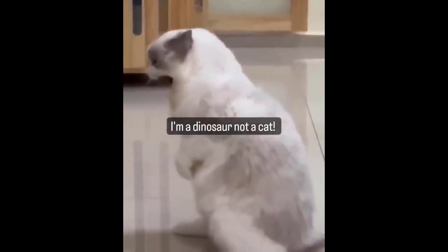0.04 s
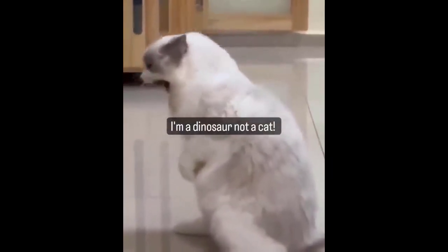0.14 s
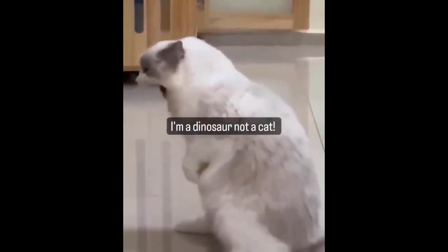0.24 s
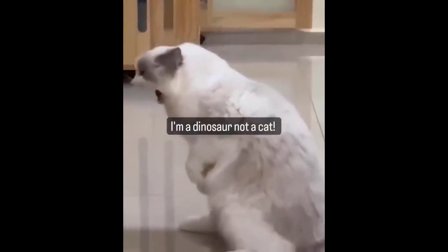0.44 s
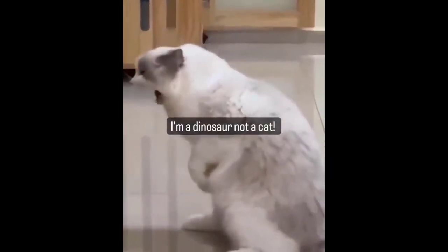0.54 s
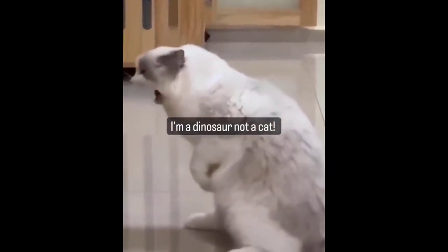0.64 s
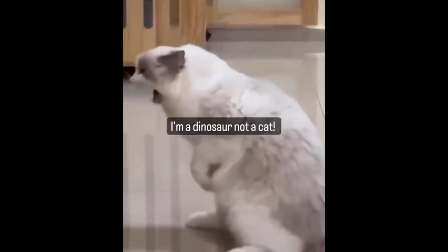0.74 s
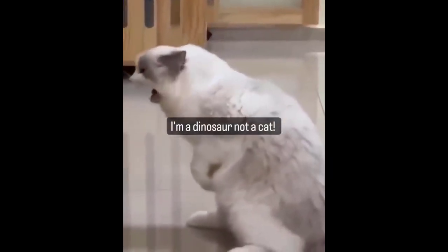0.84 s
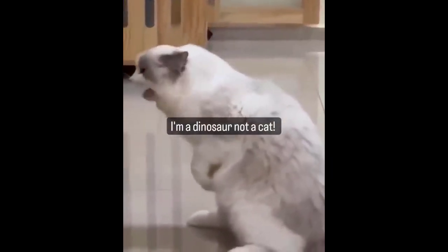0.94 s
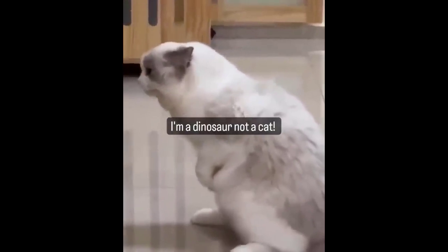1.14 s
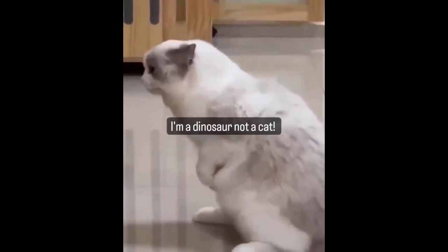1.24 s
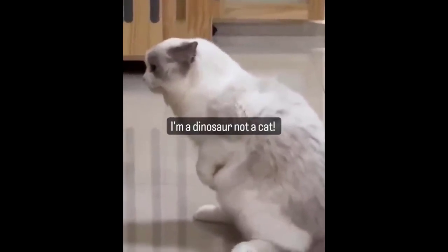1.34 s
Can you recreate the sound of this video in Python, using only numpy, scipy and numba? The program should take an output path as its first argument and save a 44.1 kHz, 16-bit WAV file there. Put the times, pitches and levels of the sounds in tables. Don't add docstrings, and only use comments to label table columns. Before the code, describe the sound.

A cat yowls once, a metre or two from a phone in a hard, echoing room. It starts very faintly, dips in pitch by 0.1 seconds, then swells and climbs from about 0.25. Between 0.4 and 0.8 it is loudest and highest, raspy and cracking. It clears, sinks and closes near 1.1, leaving a short room ring over a faint low hum.

```python
import sys
import numpy as np
from scipy import signal
from scipy.io import wavfile
from scipy.ndimage import uniform_filter1d
from numba import njit

SR = 44100
rng = np.random.default_rng(int(sys.argv[2]) if len(sys.argv) > 2 else 0)


def ratio_of_db(decibels):
    return 10 ** (np.asarray(decibels, float) / 20)


def dump_mix(stems):
    frames = np.atleast_2d(stems).T
    limited = np.clip(frames, -1, 1)
    pcm = np.round(limited * 32767).astype(np.int16)
    wavfile.write(sys.argv[1], SR, pcm)


N = 61739

# time in seconds, level in dB.
LOUDNESS = [(.005, -77.5), (.035, -60.5), (.085, -52), (.105, -45), (.17, -43.5), (.27, -27.5),
            (.37, -27.5), (.45, -22.5), (.5, -27), (.57, -22.5), (.65, -21.5), (.76, -22), (.9, -23.5),
            (.97, -26), (1.04, -29.5), (1.08, -40.5)]
# time in seconds, pitch in Hz.
PITCH_CURVE = [(.01, 731), (.05, 523.4), (.08, 426.3), (.15, 440.4), (.21, 525), (.28, 575.7),
               (.374, 634.5), (.455, 642), (.516, 688.7), (.547, 692), (.568, 712.8), (.61, 720.3),
               (.626, 767.8), (.81, 786.6), (.85, 725.4), (.93, 705.6), (1.03, 589.3), (1.09, 445.5)]
# time in seconds, half-pitch lines in dB, breath in dB,
# hiss in the bright top in dB.
ROUGHNESS = [(0, -44, -3, 12), (.12, -28, -24, 11.5), (.35, -43, -23, -10), (.39, -0.5, -17, 3),
             (.5, 5.5, -13.5, 17.5), (.6, 0, -10, -4.5), (.645, 16, -25, 7), (.7, -5, -8.5, -19.5),
             (.77, -5.5, -21, -10.5), (.83, -59, -26, -3), (.88, -65, -40, -7), (1.0, -26, -10.5, 12),
             (1.09, -11, -25.5, 3)]


def rms1(x):
    return x / np.sqrt(np.mean(x ** 2))


def curve(table, column):
    rows = np.array(table, float)
    return np.interp(np.arange(N) / SR, rows[:, 0], rows[:, column])


@njit
def resonate(x, hz, width):
    y = np.empty(len(x))
    b, l = 0., 0.
    for i in range(len(x)):
        g, k = np.tan(np.pi * hz[i] / SR), width / hz[i]
        v = (b + g * (x[i] - l)) / (1 + g * (g + k))
        b, l, y[i] = 2 * v - b, l + 2 * g * v, k * v
    return y


def band(x, hz, width):
    hz = np.clip(hz + np.zeros(len(x)), 10, .45 * SR)
    once = resonate(x, hz, 1. * width)
    return resonate(once, hz, 1. * width)


def walk(rate):
    k = max(int(SR / rate), 2)
    held = np.interp(np.arange(N) // k, np.arange(N), rng.standard_normal(N))
    return rms1(uniform_filter1d(uniform_filter1d(held, k), k))


def hum():
    # frequency in Hz, level in dB per Hz.
    spectrum = [(12, -30), (20, 1), (128, -0.5), (181, -5.5), (246, -8.5), (330, -9.5), (420, 20.5),
                (550, -37), (920, -120)]
    # time in seconds, swell in dB.
    swell = [(0, 0.5), (.3, 4), (.5, 10), (.58, 9), (.7, 14.5), (.78, 5.5), (1.4, 0)]
    rows = np.array(spectrum, float)
    rumble = 0
    for hz in 30 * 2 ** np.arange(0, 4.2, .5):
        db = np.interp(np.log(hz), np.log(rows[:, 0]), rows[:, 1]) + 0.5 * walk(9.1)
        rumble = rumble + ratio_of_db(db) * band(rng.standard_normal(N), hz, hz / 2)
    return rms1(rumble) * ratio_of_db(-74 + curve(swell, 1))


def room(x):
    # frequency in Hz, time to fall by 60 dB in seconds, level in dB.
    ringing = [(300, 0.99, -3), (648, 0.44, 7), (1200, 0.56, 2.5), (1870, 0.68, -1), (2900, 0.41, 2.5),
               (4000, 0.58, 0), (5470, 0.92, -12), (8600, 0.4, 11.5)]
    gap_s, build_s = 0.0032, 0.004
    t = np.arange(N) / SR
    echo = 0
    for hz, t60, db in ringing:
        echo = echo + ratio_of_db(db - 60 * t / t60) * band(rng.standard_normal(N), hz, 0.91 * hz)
    echo = echo * (1 - np.exp(-np.clip(t - gap_s, 0, None) / build_s))
    return signal.fftconvolve(x, echo / np.sqrt(np.sum(echo ** 2)))[:N]


def side_treble(voice):
    # frequency in Hz, width in Hz, level in dB.
    side_bands = [(5800, 1000, -16), (7200, 1200, -17), (9800, 800, -20)]
    echo = room(voice)
    return sum(ratio_of_db(db) * band(echo, hz, width) for hz, width, db in side_bands)


def cracks():
    # time in seconds, level in dB.
    breaks = [(.56, -62), (.571, -64), (.574, -62), (.577, -65), (.631, -66), (.665, -63), (.668, -61),
              (.686, -66), (.689, -62), (.692, -65), (.705, -67)]
    ticks = np.zeros(N)
    for s, db in breaks:
        ticks[int(s * SR)] = ratio_of_db(db + 4) * 5
    return band(ticks, 12800, 4000)


def partials(numbers, pair, tilt):
    total = 0
    for k in numbers:
        swell = ratio_of_db(2.5 * walk(14) - tilt * np.log2(k))
        total = total + swell * np.cos(k * pair + 0.0593 * k * k)
    return total


def folds():
    # time in seconds, pitch jitter in percent.
    strain = [(0, 1.4), (.1, .35), (.3, .3), (.45, .18), (.51, .35), (.58, .2), (.64, .7), (.7, .15),
              (.8, .1), (.95, .25), (1.09, .8)]
    soft_below_db = -38
    soft_tilt = 0.78
    hz = curve(PITCH_CURVE, 1) * (1 + curve(strain, 1) / 100 * walk(120))
    pair = np.pi * np.cumsum(uniform_filter1d(hz, size=100)) / SR
    tilt = soft_tilt * np.clip(soft_below_db - curve(LOUDNESS, 1), 0, None)
    even = partials(range(2, 40, 2), pair, tilt)
    odd = partials(range(1, 40, 2), pair, tilt)
    half = ratio_of_db(curve(ROUGHNESS, 1))
    tone = (even + half * odd) / np.sqrt(10 * (1 + half ** 2))
    shimmer = ratio_of_db(1.2 * walk(45))
    breath = ratio_of_db(-2 * tilt) * rng.standard_normal(N) * (1 + .5 * np.cos(2 * pair))
    return tone * shimmer, breath


def bright_top(tone, breath, buzz):
    # frequency in Hz, width in Hz, level in dB.
    top_bands = [(5695, 1060, -3), (6660, 910, -9), (7309, 300, -8.5), (8090, 1360, -13.5),
                 (10060, 480, -24.5), (12040, 480, -37)]
    hiss = ratio_of_db(curve(ROUGHNESS, 3))
    rasp = breath * ratio_of_db(3 * walk(50))
    source = (tone + hiss * rasp) / np.hypot(1, hiss)
    top = 0
    for k, (hz, width, db) in enumerate(top_bands):
        top = top + (-1) ** k * ratio_of_db(db) * band(source, hz, width)
    return top - ratio_of_db(9.5) * band(buzz, 4183, 488)


def cat():
    # time in seconds, low resonance in Hz, high resonance in Hz, high against low in dB,
    # bright top in dB, chest in dB.
    mouth = [(0, 1450, 2470, -15, -27, -25.5), (.07, 1430, 2900, 1, -32.5, -23.5),
             (.11, 1690, 3300, -14, -29.5, -24), (.2, 2334, 3410, -17.5, -30.5, -13.5),
             (.3, 2916, 4000, -16, -21.5, -49.5), (.45, 2924, 3900, 2.5, -15, -25.5),
             (.58, 2530, 3756, 3, -6, -24.5), (.73, 2620, 3930, 9.5, -3, -34.5),
             (.81, 2407, 3667, 4.5, -30.5, -25.5), (.92, 2312, 3404, -1.5, -16.5, -23.5),
             (1.0, 2002, 2960, -14.5, -22, -21.5), (1.09, 1730, 2436, -55, -34.5, -10.5)]
    tone, breath = folds()
    breath_db = np.minimum(curve(ROUGHNESS, 2), -21)
    buzz = tone + ratio_of_db(breath_db) * breath
    low = band(buzz, curve(mouth, 1), 878)
    high = ratio_of_db(curve(mouth, 3)) * band(buzz, curve(mouth, 2), 855)
    top = ratio_of_db(curve(mouth, 4)) * bright_top(tone, breath, buzz)
    chest = ratio_of_db(curve(mouth, 5)) * band(buzz, curve(PITCH_CURVE, 1), 780)
    throat = ratio_of_db(-16.5) * band(buzz, 1450, 1295)
    body = ratio_of_db(-31.5) * band(tone, 384, 52)
    voice = low - high + top + chest - throat + body
    voice = voice / np.sqrt(uniform_filter1d(voice ** 2, size=2000))
    release_s = 0.023
    past_end = np.arange(N) / SR - LOUDNESS[-1][0]
    fade = np.clip(1 - past_end / release_s, 0, 1) ** 2
    return voice * ratio_of_db(curve(LOUDNESS, 1)) * fade


def scene():
    voice = cat()
    heard = ratio_of_db(-0.5) * (voice + ratio_of_db(-2) * room(voice))
    heard = heard - 0.27 * resonate(heard, np.full(N, 796.), 67.)
    side = side_treble(voice)
    port = signal.butter(6, 10200, fs=SR, output="sos")
    middle = signal.sosfilt(port, heard) + cracks() + hum()
    return middle + side * np.array([[1], [-1]])


def roll_off(x):
    return signal.sosfilt(signal.butter(12, 15560, fs=SR, output="sos"), x)


def record(dry):
    return roll_off(dry)


dry = scene()
out = record(dry)
dump_mix(out)
```